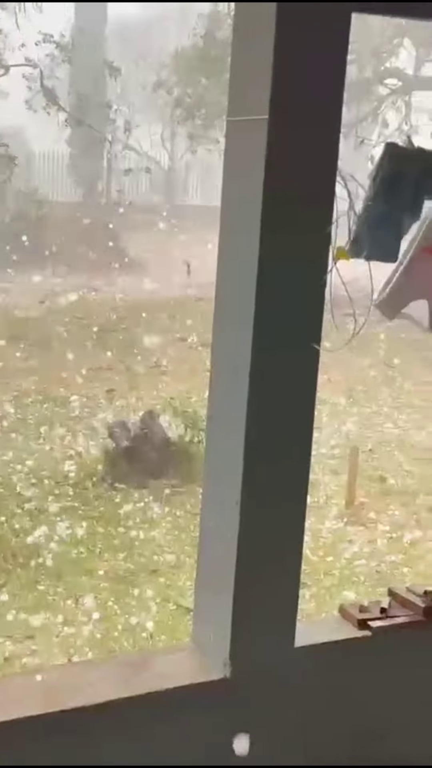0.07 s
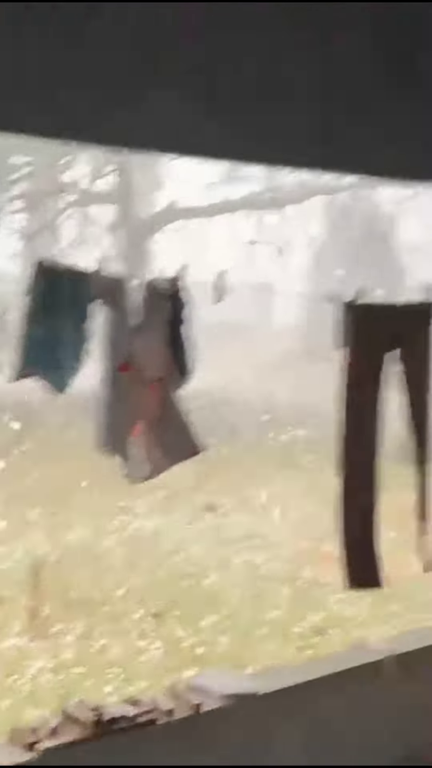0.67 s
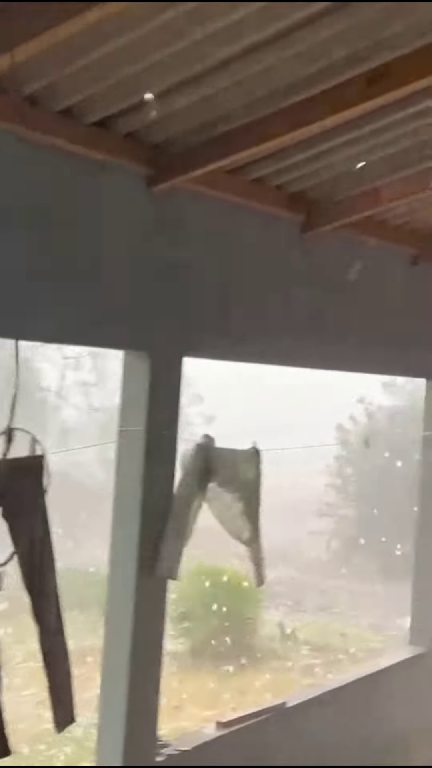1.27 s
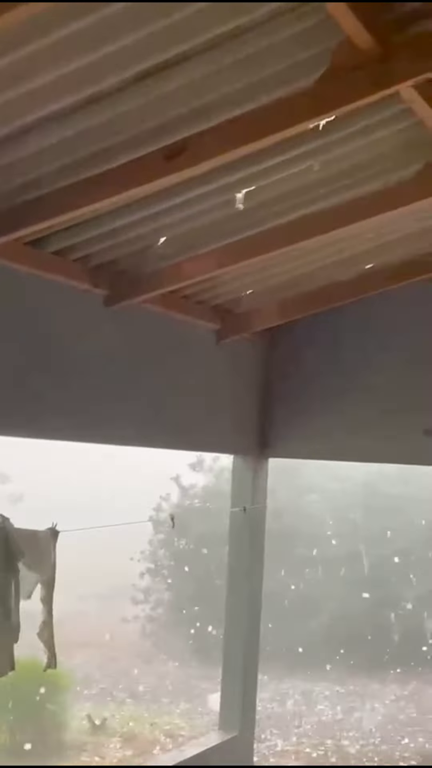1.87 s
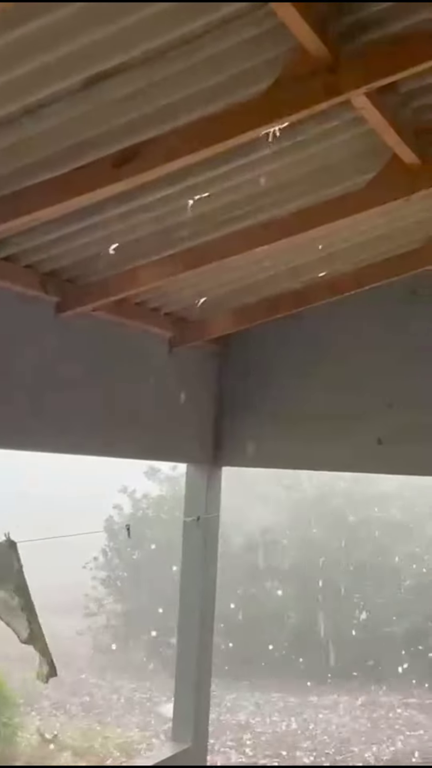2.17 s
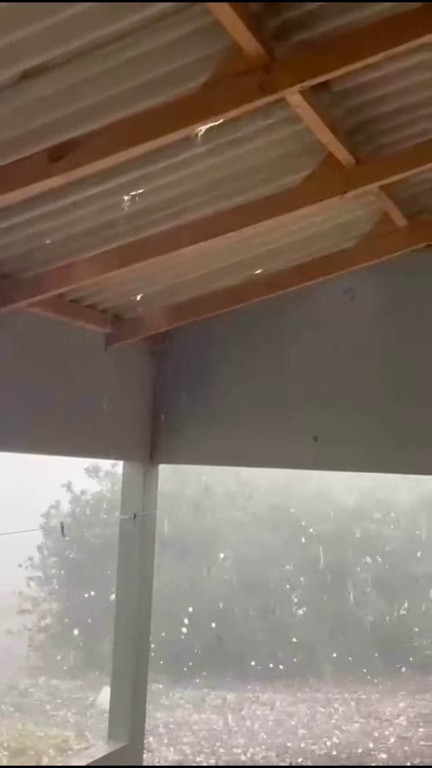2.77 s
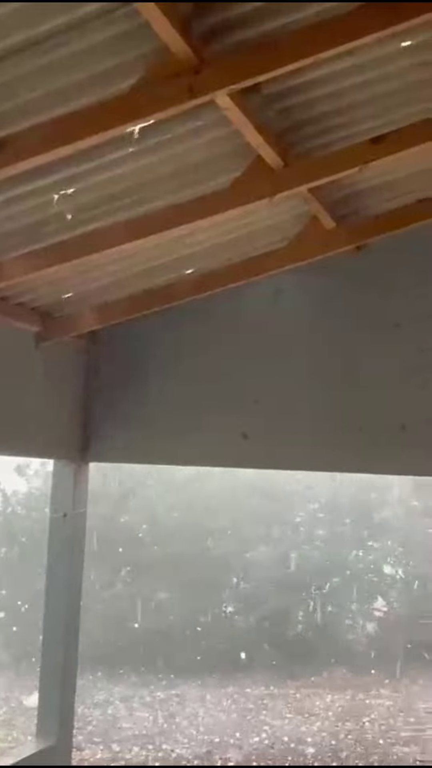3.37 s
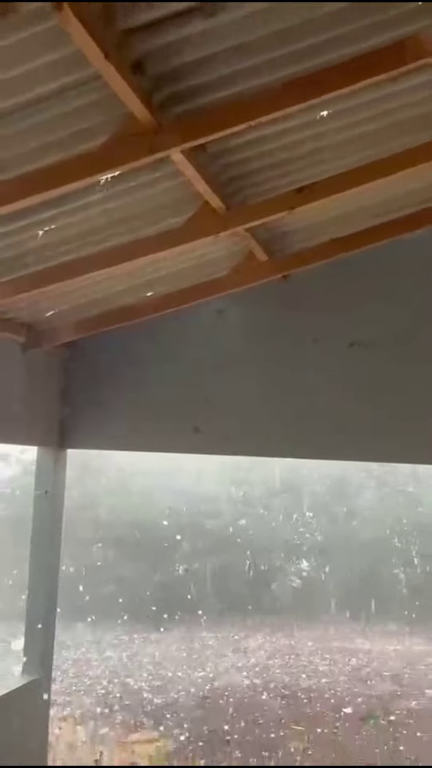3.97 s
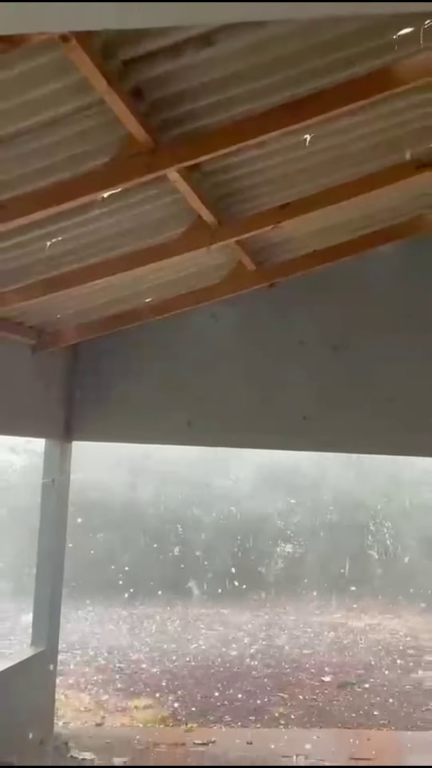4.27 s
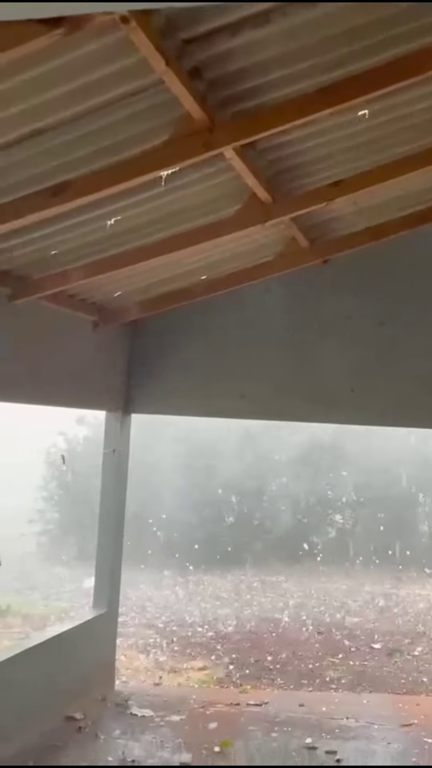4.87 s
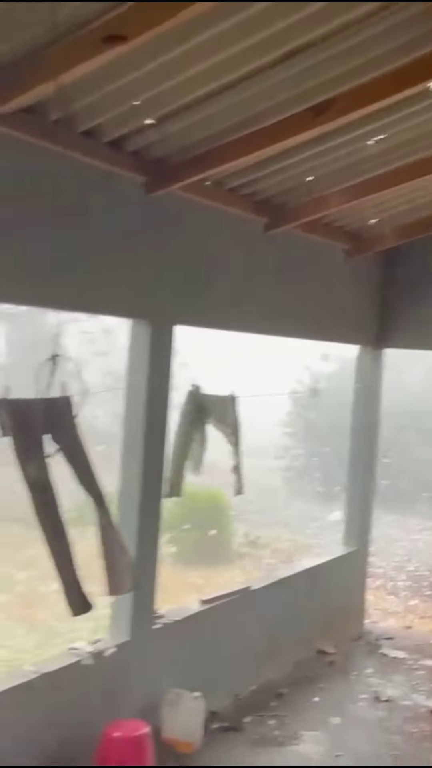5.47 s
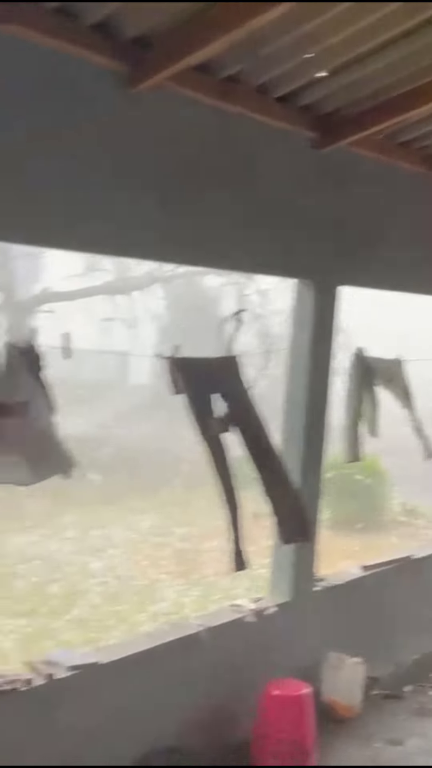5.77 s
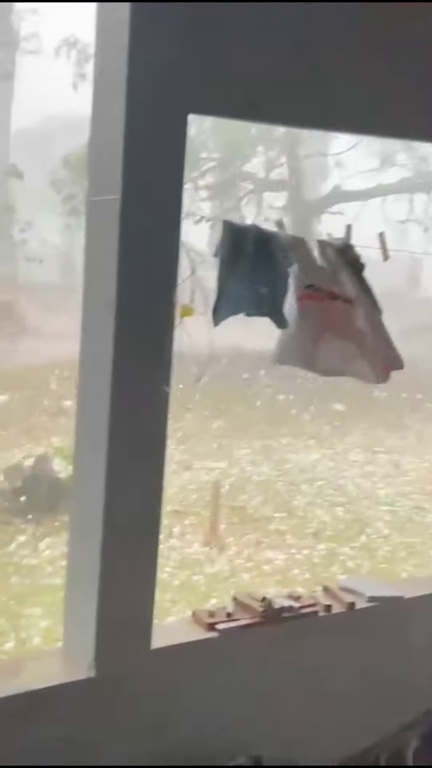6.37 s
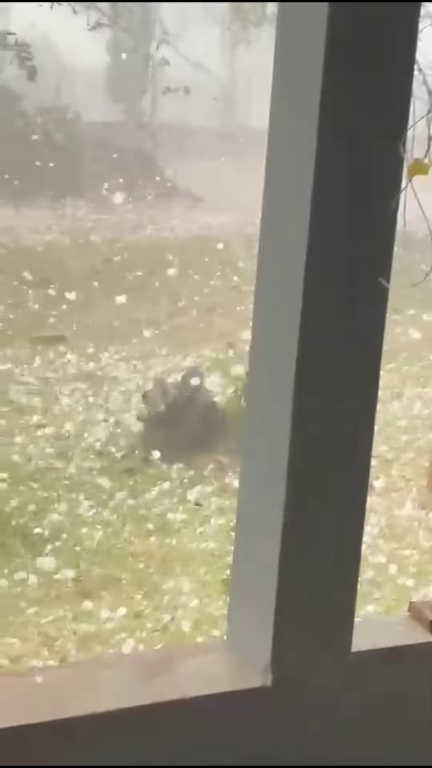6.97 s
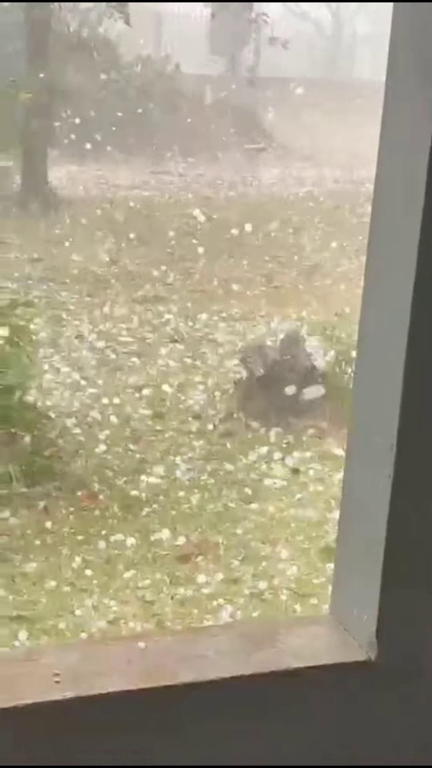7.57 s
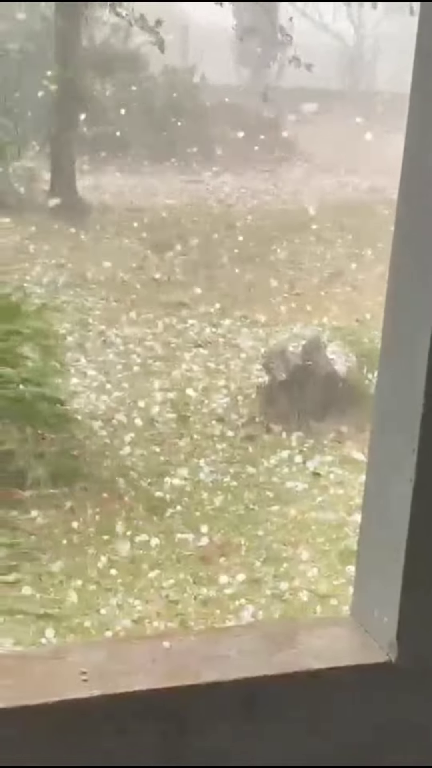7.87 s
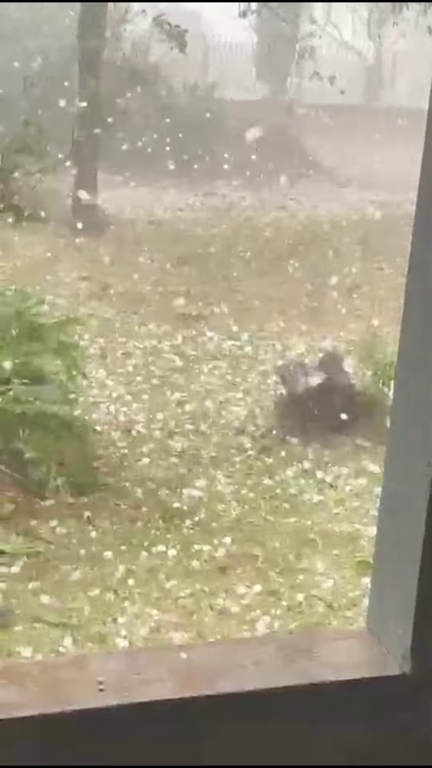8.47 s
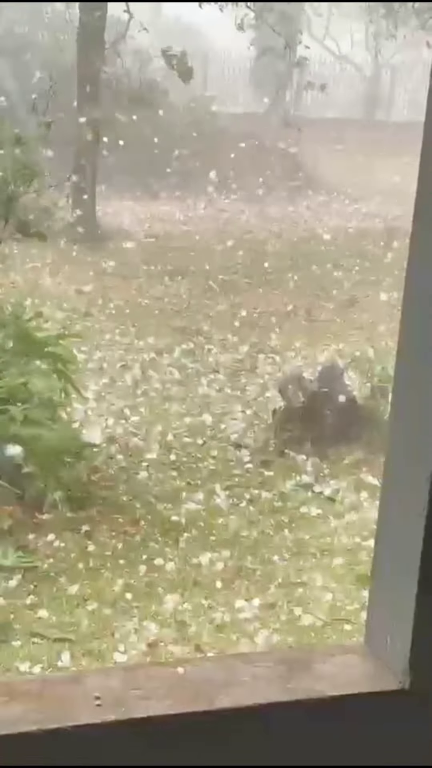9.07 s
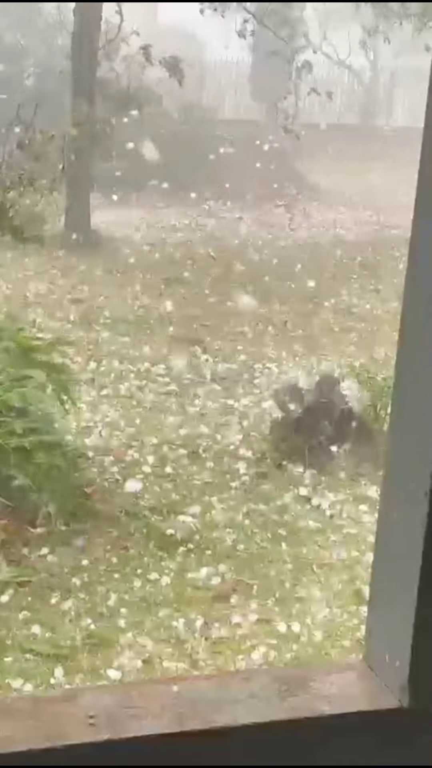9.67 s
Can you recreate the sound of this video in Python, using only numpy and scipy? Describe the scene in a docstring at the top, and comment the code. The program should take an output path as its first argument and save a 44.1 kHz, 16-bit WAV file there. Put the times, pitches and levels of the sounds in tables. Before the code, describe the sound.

Heavy hail drums on a corrugated porch roof and spatters the yard in a dense, continuous roar over low wind.

```python
"""Hail drums on a corrugated porch roof overhead, thousands of stones ringing and flexing the sheets.
Pellets and rain spatter the yard beyond, over a low rumble of wind. The storm comes in uneven waves
and slowly eases; gusts fling down flurries, each with a brief lull behind it. Big stones thud on the
roof or crack on masonry close by, strays tick on the porch floor, and pellets snap on the wet paving
as the microphone turns to it."""
import sys
import numpy as np
from scipy import signal
from scipy.fft import rfft, irfft, next_fast_len
from scipy.io import wavfile

SR = 44100
rng = np.random.default_rng(int(sys.argv[2]) if len(sys.argv) > 2 else 0)


def store_pcm(level_fs):
    """Save levels as 16-bit WAV."""
    pcm = np.round(np.clip(level_fs, -1, 1) * 32767).astype(np.int16)
    wavfile.write(sys.argv[1], SR, np.atleast_2d(pcm).T)


N = 429093
TIME = np.arange(N) / SR

# the storm's slow fader moves: (time [s], roof rattle [dB], yard spatter [dB], roof boom [dB])
STORM_LEVELS = [(0, -21, -30.5, -25), (1, -21.0, -30.3, -25.3), (1.6, -19, -28, -25),
                (2.3, -21, -31.0, -27.5), (3.3, -20.5, -29.8, -28), (3.8, -23.5, -33, -29.0),
                (4.8, -20.5, -30, -25.5), (6, -23.3, -33, -27.3), (6.7, -22, -31.8, -26.6),
                (7.3, -24.5, -33, -27.5), (8.4, -23, -32, -25.7), (9.73, -23.5, -32.5, -26)]
# flurries flung down by gusts: (crest time [s], length [s], roof swell [dB], yard swell [dB])
GUST_FLURRIES = [(0.04, 0.34, 3.0, 1), (0.32, 0.34, 2, 2.5), (0.485, 0.34, 2.5, -0.4),
                 (0.7, 0.34, 1.8, 0.5), (0.913, 0.34, 2.5, 2), (1.3, 0.19, 2, 1.5), (1.657, 0.12, 1.5, 0.8),
                 (2.081, 0.12, 2, 2.5), (2.33, 0.27, 1.5, 2.5), (2.54, 0.087, 4.5, 3.5),
                 (2.66, 0.26, 1, -0.5), (2.98, 0.083, 1.8, 1), (3.079, 0.09, 2.8, 2.5),
                 (3.53, 0.12, 2.5, 2.5), (3.667, 0.12, 2, 1.5), (3.86, 0.33, 3, 1.8),
                 (4.17, 0.21, 1.6, 3.5), (4.352, 0.27, 1.5, 2.2), (4.54, 0.091, 3.5, 4.5),
                 (5.148, 0.09, 1.5, 2), (5.73, 0.07, 1.5, 2.5), (5.927, .1, .5, 3), (6.248, 0.07, 2, 1.3),
                 (6.341, 0.09, 2.5, 1.5), (6.352, 0.34, 2.0, 1.6), (6.542, 0.34, 2, 1.7),
                 (6.939, 0.2, 2.5, 4), (7.268, 0.25, 0.5, 2.5), (7.65, 0.34, 1, 3),
                 (7.841, 0.097, 3.0, 1.9), (8.13, 0.16, -0.5, 1.5), (8.21, 0.29, 2.5, 2.0),
                 (8.41, 0.07, 3, 1.5), (8.648, 0.14, 3, 2.2), (9.102, 0.2, 1.5, 1), (9.58, 0.079, 3.2, 2.5)]
# tone of the wind's low roar: (frequency [Hz], level [dB])
WIND_EQ = [(10, -50), (30, -23.5), (46, -7), (65, -0.5), (100, -2), (125, -6), (170, -5.5), (300, -16),
           (800, -35.5)]
# tone of ice and water on hard ground: (frequency [Hz], level [dB])
YARD_EQ = [(200, -15), (1000, 0.5), (2200, 1.5), (3700, -.5), (4900, 1.1), (6000, -2), (7100, -5),
           (8300, -4.5), (9300, -9.5), (10100, -8.7), (11300, -16.5)]
# how long a tick of ice lasts: (frequency [Hz], t60 [s])
ICE_DECAY = [(500, 0.065), (4000, 0.06), (10000, 0.033)]
# tone of a pellet on wet concrete: (frequency [Hz], level [dB])
WET_CONCRETE_EQ = [(1700, -17), (2800, -1.5), (5600, 0), (11000, -15)]
# pellets skipping onto the porch floor: (time [s], level [dB])
FLOOR_HITS = [(0.058, -13.5), (1.564, -15.5), (3.829, -17), (4.707, -17), (6.048, -17), (7.583, -16.5),
              (8.361, -18)]
# stones shattering on wall and floor: (time [s], level [dB], top of the band [Hz], wide share [0-1])
MASONRY_HITS = [(1.4155, -10, 5200, 0), (3.55, -14.5, 4200, 0), (5.9325, -13.5, 5400, 0.1),
                (8.1055, -12, 7400, 1)]
# tone of the sheets flexing on their rafters: (frequency [Hz], level [dB])
FLEX_EQ = [(40, -41), (120, -6.5), (160, 0), (205, -3), (290, 0.4), (380, -1.7), (540, -8), (1000, -23.5),
           (3000, -44.5)]
# tone of a stone on the sheets: (frequency [Hz], level [dB])
SHEET_EQ = [(100, -29.5), (250, -9.5), (420, -4.5), (560, -0.94), (850, 0.9), (1050, -1.5), (1300, -5),
            (1600, -6.5), (2100, -9.5), (3200, -17.5), (6000, -26.5), (11000, -42)]
# how long the sheets ring: (frequency [Hz], t60 [s])
SHEET_DECAY = [(100, .16), (400, 0.098), (1200, 0.067), (6000, 0.035)]
# big stones on the roof: (time [s], level [dB], band centre [Hz])
ROOF_HITS = [(0.305, -8, 440), (0.347, -14.5, 384), (1.304, -12.5, 500), (1.653, -14.5, 715),
             (2.068, -13, 480), (2.342, -14.5, 334), (2.535, -12.5, 729), (2.728, -14.5, 226),
             (2.95, -15, 900), (2.973, -11, 470), (3.061, -13, 640), (3.401, -14.5, 520), (3.672, -14, 869),
             (3.893, -13, 676), (4.138, -16, 665), (4.533, -13.5, 800), (4.784, -14.5, 680),
             (5.378, -14.5, 600), (6.474, -15.5, 428), (6.603, -13.5, 380), (6.86, -15.5, 500),
             (6.975, -15.5, 546), (8.408, -14, 426), (8.775, -13.5, 780), (8.852, -14, 300),
             (9.096, -16, 471), (9.147, -14, 400), (9.398, -13.5, 650)]
# stereo image by frequency: (frequency [Hz], likeness [0-1], left lead [rad])
STEREO_IMAGE = [(130, 1, 0), (220, 1, -0.07), (360, 0.94, -0.36), (700, 0.72, -.5), (1050, 0.56, -.3),
                (1590, 0.63, -0.45), (1830, .86, 0), (2254, 0.77, 1.3), (2640, 0.7, 2.5),
                (3410, 0.56, 0.46), (4080, 0.78, 0.5), (4530, .43, 1.48), (5000, 0.53, 1.3),
                (5420, 1, 3.14), (6830, 1, 3.14), (7100, 1, 6.28), (8950, 1, 6.28), (9430, 1, 9.42)]
# the mids lean left, toward the roof: (frequency [Hz], left minus right [dB])
STEREO_BALANCE = [(170, 0), (320, 1.5), (650, 3), (1200, 2), (2500, 0)]

WAVE_HZ, WAVE_SPREAD_OCT, WAVE_DB, TROUGH_SKEW = 9.0, 0.84, 0.43, 0.16
LULL_DEPTH, LULL_DELAY_S, LULL_S = 1.2, 0.051, 0.16  # depth in dB per dB of swell
ROOF_FOLLOWS, YARD_FOLLOWS, BOOM_FOLLOWS, WIND_FOLLOWS = 0.93, 0.91, 0.72, .3  # dB per dB of surge


def gain_of(db):
    """Decibels to a gain factor."""
    return 10 ** (np.asarray(db) / 20)


def unit_rms(x):
    """Scales to rms 1."""
    return x / np.sqrt(np.mean(x ** 2) + 1e-20)


def curve(points, hz, column=1):
    """One column of a table, joined by lines over log frequency."""
    table = np.array(points, float)
    return np.interp(np.log(hz + 1), np.log(table[:, 0] + 1), table[:, column])


def add(mix, s, sound):
    """Lays a sound into the mix at time s."""
    part = mix[:, max(round(s * SR), 0):][:, :sound.shape[1]]
    part += sound[:, :part.shape[1]]


def equalise(x, eq):
    """Shapes x with an EQ curve, at rms 1."""
    size = next_fast_len(x.shape[-1] + 4096)
    gain = gain_of(curve(eq, np.fft.rfftfreq(size, 1 / SR)))
    return unit_rms(irfft(rfft(x, size) * gain, size)[..., :x.shape[-1]])


def arch(s, length):
    """A smooth fade from 0 to 1 and back, centred on time s."""
    out = np.zeros(N)
    inside = slice(*np.searchsorted(TIME, [s - length / 2, s + length / 2]))
    out[inside] = np.cos(np.pi * (TIME[inside] - s) / length) ** 2
    return out


def storm(column):
    """How hard the storm comes down on one layer, in dB."""
    table = np.array(STORM_LEVELS)
    return np.interp(TIME, table[:, 0], table[:, column])


def waves():
    """The fall wavers at random, with broad crests and short, deep troughs; rms 1."""
    t = np.arange(0, N / SR + .01, .01)
    octaves = np.linspace(-1.5, 2.5, 60)[:, None]
    phase, detune = rng.random((2, len(octaves), 1))
    height = np.exp(-.5 * (octaves / WAVE_SPREAD_OCT) ** 2)
    rate_hz = WAVE_HZ * 2 ** (octaves + detune / 10)
    swell = unit_rms((height * np.sin(2 * np.pi * (rate_hz * t + phase))).sum(0))
    return np.interp(TIME, t, unit_rms(swell - TROUGH_SKEW * (swell ** 2 - 1)))


def flurries(column):
    """A gust bunches the hail, so each flurry swells and leaves a lull behind; in dB."""
    surge_db = np.zeros(N)
    for row in GUST_FLURRIES:
        s, length = row[:2]
        lull = LULL_DEPTH * arch(s + length / 2 + LULL_DELAY_S, LULL_S)
        surge_db += row[column] * (arch(s, length) - lull)
    return surge_db


def impact(decay, click, tilt_db=0, size=6144):
    """A contact click, then crowded modes and reflections dying band by band; tilt is per octave."""
    hz, t, bands = signal.stft(rng.standard_normal((2, size)), SR, nperseg=128)
    fade = np.exp(-np.log(1000) * t / curve(decay, hz)[:, None])
    tail = signal.istft(bands * fade, SR, nperseg=128)[1]
    tail /= np.linalg.norm(tail[0])
    tail[[0, 1], rng.integers(8, 56, 2)] += click * rng.choice([-1, 1], 2)  # direction sets the arrival
    octaves = np.log2(np.clip(np.fft.rfftfreq(size, 1 / SR), 150, 8000) / 1000)
    return irfft(rfft(tail) * gain_of(tilt_db * octaves))


def soft_attack(x, rise_s):
    """A blow arriving from many points and by many paths builds up over a moment."""
    return x * (1 - np.exp(-np.arange(x.shape[-1]) / SR / rise_s))


def pelting(per_s, spread_db, decay, click, tilt_db, spots):
    """Stones land at random on many spots, each with its own ring; most are small, a few large."""
    hits = gain_of(spread_db * np.minimum(rng.exponential(1, N), 4.5))
    hits *= rng.random(N) < per_s / SR
    hits *= rng.choice([-1, 1], N)
    spot, out = rng.integers(0, spots, N), np.zeros((2, N))
    for k, hardness in enumerate(np.linspace(-1, 1, spots)):
        blow = impact(decay, click, tilt_db * hardness).astype(np.float32)
        hits_here = (hits * (spot == k)).astype(np.float32)
        out += signal.oaconvolve(hits_here[None], blow, axes=1)[:, :N]
    return out


def knocks(per_s, spread_db, low_hz, high_hz, t60, size=6000):
    """Near stones each wake a short note of their own, with a weaker upper mode."""
    out, t = np.zeros((2, N)), np.arange(size) / SR
    contact = 1 - np.exp(-t / 0.00054)  # the stone presses for half a millisecond
    for when, pitch, heft, upper, *phases in rng.random((round(per_s * N / SR), 6)):
        hz = low_hz * (high_hz / low_hz) ** pitch
        ring = np.exp(-np.log(1000) * t / t60 * np.sqrt(hz / low_hz))  # high notes die sooner
        angle = 2 * np.pi * (hz * t + np.array(phases)[:, None])
        note = np.sin(angle) + .5 * ring * np.sin(angle * (1.3 + upper))
        strength = gain_of(spread_db * min(-np.log(1 - heft), 2.7))
        add(out, when * N / SR, strength * contact * ring * note)
    return unit_rms(out)


def wind(surge_db):
    """A low bed of wind that leans into the surges and slowly eases."""
    roar = equalise(rng.standard_normal((2, N)), WIND_EQ)
    return roar * gain_of(np.linspace(-33.2, -37.8, N) + WIND_FOLLOWS * surge_db)


def yard(surge_db, own_waves_db=0.5):
    """Pellets patter, and the nearest clink, over the even hiss of rain farther out."""
    pellets = pelting(per_s=1300, spread_db=2.5, decay=ICE_DECAY, click=0.39, tilt_db=2.5, spots=16)
    pellets = equalise(pellets, YARD_EQ)
    clinks = knocks(per_s=220, spread_db=2.5, low_hz=1795, high_hz=7990, t60=0.086, size=1500)
    rain = equalise(rng.standard_normal((2, N)), YARD_EQ)
    level_db = storm(column=2) + YARD_FOLLOWS * surge_db + own_waves_db * waves()
    return (gain_of(-1) * pellets + gain_of(-7.0) * clinks + gain_of(-2.4) * rain) * gain_of(level_db)


def paving(level_db=-35.7):
    """Pellets snap on wet paving, fading in and out as the microphone turns to it and away."""
    snaps = pelting(per_s=600, spread_db=2.5, decay=[(4000, .04)], click=.3, tilt_db=1.5, spots=12)
    facing = np.sqrt(arch(s=5.24, length=4.6))
    return gain_of(level_db) * equalise(snaps, WET_CONCRETE_EQ) * facing


def floor_ticks():
    """A pellet that skips in under the roof gives one dry, bright tick."""
    out = np.zeros((2, N))
    for s, db in FLOOR_HITS:
        tick = equalise(impact(decay=[(4000, .022)], click=.3), WET_CONCRETE_EQ)
        add(out, s, gain_of(db) * tick / abs(tick).max())
    return out


def masonry_cracks():
    """Ice bursts on masonry with a short crack; returns a wide share and the rest for the hail's image."""
    wide, blended = np.zeros((2, 2, N))
    for s, db, top_hz, wide_share in MASONRY_HITS:
        band = signal.butter(3, [600, top_hz], "bandpass", fs=SR, output="sos")
        burst = impact(decay=[(1500, .065), (7000, .033)], click=.1, tilt_db=-1.0)
        crack = signal.sosfilt(band, soft_attack(burst, rise_s=.003))
        crack = gain_of(db) * crack / abs(crack).max()
        add(wide, s, wide_share * crack)
        add(blended, s, np.sqrt(1 - wide_share ** 2) * crack)
    return wide, blended


def roof_boom(surge_db):
    """The low body of the roof: heavier stones flex whole sheets, swelling with each surge."""
    blows = pelting(per_s=600, spread_db=2.0, decay=[(100, 0.14), (600, 0.088)],
                    click=0.41, tilt_db=1, spots=24)
    level_db = storm(column=3) + BOOM_FOLLOWS * surge_db
    return gain_of(-2.5) * equalise(blows, FLEX_EQ) * gain_of(level_db)


def roof_rattle(surge_db):
    """Dense hail rattles on the corrugated sheets, with hollow knocks among it."""
    rattle = pelting(per_s=2100, spread_db=2.5, decay=SHEET_DECAY, click=0.48, tilt_db=2.0, spots=32)
    hollow = knocks(per_s=90, spread_db=2.5, low_hz=380, high_hz=1550, t60=.12)
    level_db = storm(column=1) + ROOF_FOLLOWS * surge_db
    return (gain_of(-3.5) * equalise(rattle, SHEET_EQ) + gain_of(-8.5) * hollow) * gain_of(level_db)


def thud(hz):
    """A heavy stone stays longer on the sheet, so its blow gathers round a low pitch; peak 1."""
    band = signal.butter(1, [hz * .7, hz * 1.43], "bandpass", fs=SR, output="sos")
    blow = soft_attack(impact(decay=[(200, .09), (2000, .045)], click=.5), rise_s=.003)
    sound = signal.sosfilt(band, equalise(blow, SHEET_EQ))
    return sound / abs(sound).max()


def big_stones(lesser_count=3, lesser_db=-5.5, scatter_s=.025):
    """Each big stone lands among a few lesser ones of other pitches, which makes its thud rattle."""
    out = np.zeros((2, N))
    for s, db, hz in ROOF_HITS:
        add(out, s, gain_of(db) * thud(hz))
        for lag, octave in rng.uniform(-1, 1, (lesser_count, 2)):
            add(out, s + scatter_s * lag, gain_of(db + lesser_db) * thud(hz * 2 ** octave))
    return out


def stereo_image(x):
    """Alike in the bass, wider in the mids, treble bands alternately in opposite and equal phase."""
    size = next_fast_len(N + 4096)
    hz = np.fft.rfftfreq(size, 1 / SR)
    left, other = rfft(x, size)
    likeness, lead = curve(STEREO_IMAGE, hz, column=1), curve(STEREO_IMAGE, hz, column=2)
    right = (likeness * left + np.sqrt(1 - likeness ** 2) * other) * np.exp(-1j * lead)
    lean = gain_of(curve(STEREO_BALANCE, hz) / 2)
    return irfft(np.array([left * lean, right / lean]), size)[:, :N]


def scene():
    """Flurries and waves drive roof, yard and wind; the cracks' wide share skips the stereo shaping."""
    wave_db = WAVE_DB * waves()
    overhead_db = flurries(column=2) + wave_db
    outside_db = flurries(column=3) + wave_db
    roof = roof_rattle(overhead_db) + roof_boom(overhead_db)
    ground = yard(outside_db) + paving()
    accents = big_stones() + floor_ticks()
    bed = wind(overhead_db)
    wide_cracks, blended_cracks = masonry_cracks()
    return stereo_image(roof + ground + accents + bed + blended_cracks) + wide_cracks


def record(dry, cutoff_hz=11350):
    """A steep low-pass takes the air off the top of the mix."""
    lowpass = signal.firwin(511, cutoff_hz, window=("kaiser", 9), fs=SR)
    return signal.oaconvolve(dry, lowpass[None], "same")


dry = scene()
out = record(dry)
store_pcm(out)
```